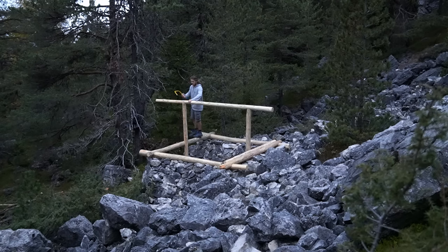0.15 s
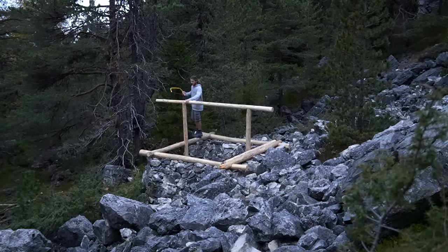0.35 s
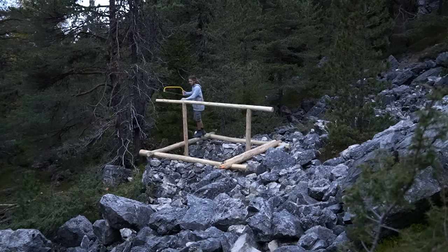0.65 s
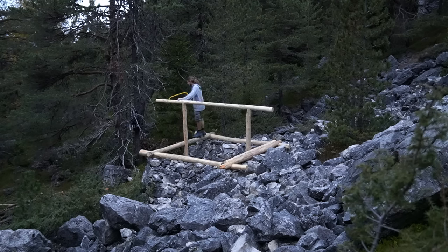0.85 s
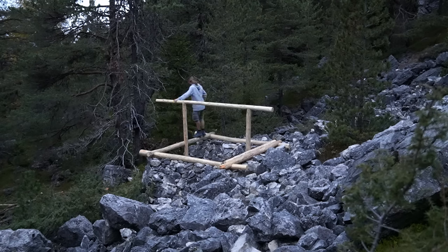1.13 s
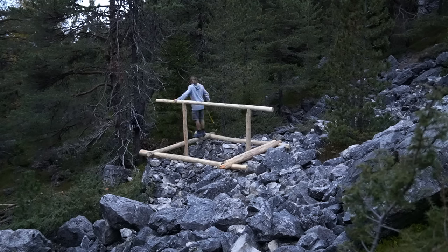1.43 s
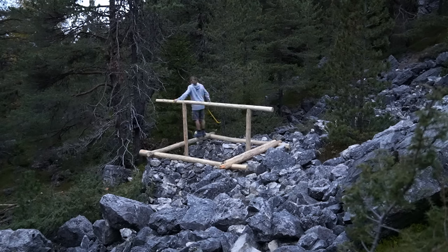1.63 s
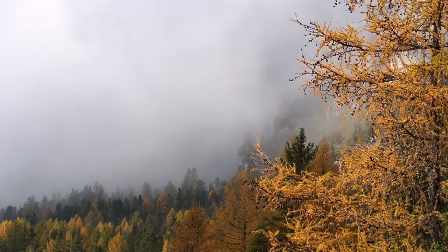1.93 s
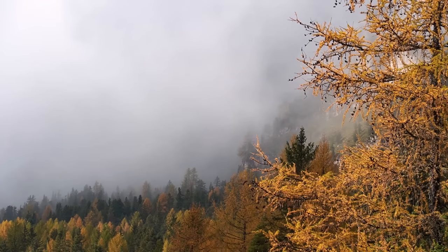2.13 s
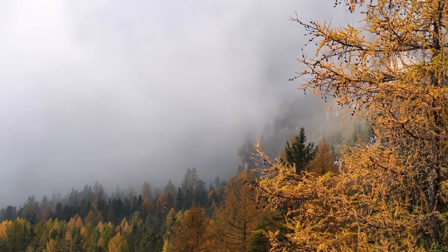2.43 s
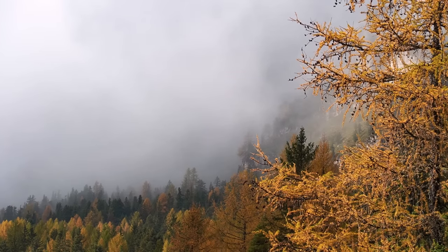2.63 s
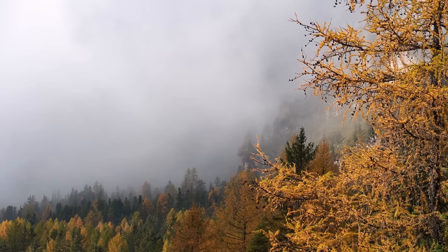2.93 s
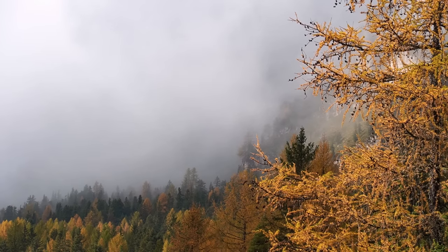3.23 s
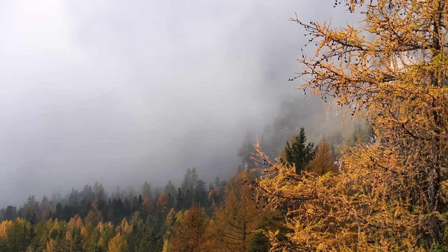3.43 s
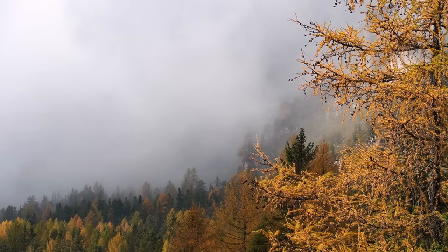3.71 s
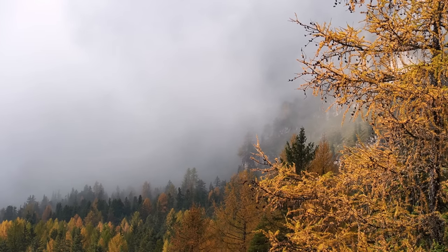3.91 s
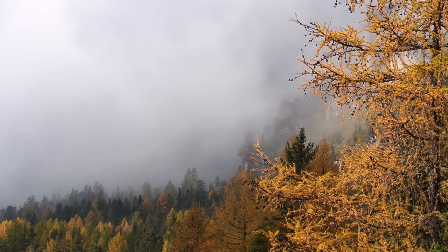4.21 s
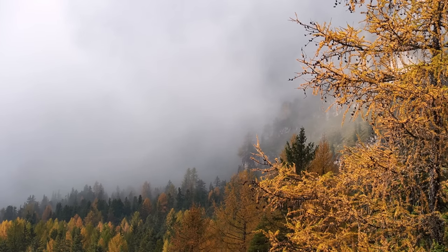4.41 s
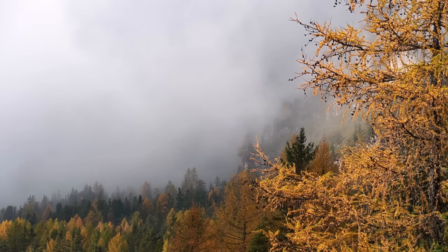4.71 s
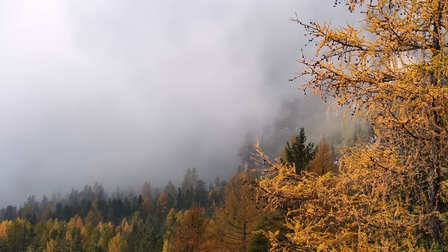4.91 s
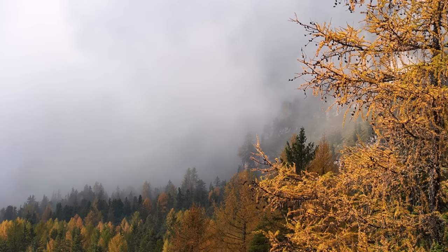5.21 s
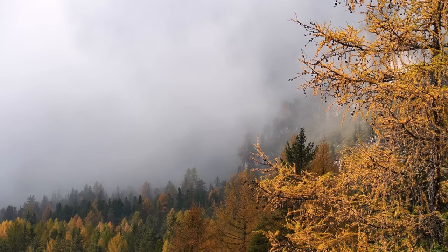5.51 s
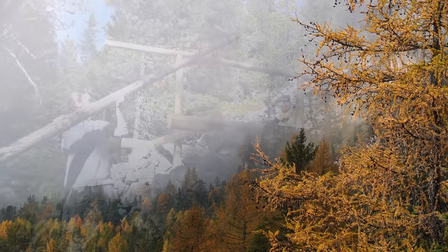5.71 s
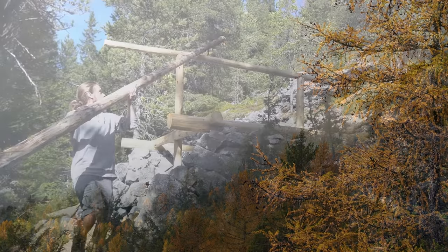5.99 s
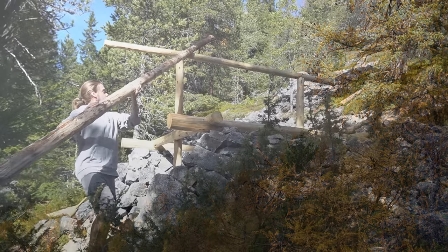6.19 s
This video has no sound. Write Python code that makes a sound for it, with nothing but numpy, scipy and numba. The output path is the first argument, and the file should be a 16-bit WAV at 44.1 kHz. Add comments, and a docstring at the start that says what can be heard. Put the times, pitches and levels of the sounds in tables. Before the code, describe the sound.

Stones clack and grit slides on a rocky slope, steel tinkles faintly, then heavy wind buffets the microphone before a wooden pole knocks on logs.

```python
"""Stones clack and grit slides on a scree slope, over trees soughing and the microphone's hiss; steel tinkles.
Gusts then buffet the microphone into its limiter. Close by, a long pole knocks on a log frame, bark rustles and snaps.
Stones, sharp cracks and bark are shaped grains; pole and tool are decaying modes struck by short pushes;
wind and trees are coloured noise with wandering levels, the hardest eddies single swings with a sharp corner."""
import sys
import numpy as np
from scipy import signal
from scipy.fft import rfft, irfft, next_fast_len
from scipy.io import wavfile
from scipy.ndimage import uniform_filter1d, minimum_filter1d
from numba import njit

SR = 44100
rng = np.random.default_rng(int(sys.argv[2]) if len(sys.argv) > 2 else 0)


def waveform_to_disk(signal):
    """Save audio, clipped to [-1, 1], as 16-bit WAV at the path in sys.argv[1]."""
    frames = np.transpose(np.atleast_2d(signal))
    scaled = np.clip(frames, -1, 1) * 32767
    samples = np.round(scaled).astype(np.int16)
    wavfile.write(sys.argv[1], SR, samples)


N = 280035


def undb(db):
    """Gain of a level in dB."""
    return 10 ** (np.asarray(db) / 20)


def curve(table):
    """Joins the rows of a table by straight lines; returns each column after the time, per sample."""
    s, *columns = np.transpose(table)
    now = np.arange(N) / SR
    return [np.interp(now, s, column) for column in columns]


def colour(x, points):
    """Shapes x by (Hz, dB) points, holds the end levels for an octave, cuts the rest; rms 1."""
    hz, db = np.transpose(points)
    size = next_fast_len(len(x))
    f = np.arange(size // 2 + 1) * SR / size
    inside = (f > hz[0] / 2) * (f < hz[-1] * 2)
    gain = undb(np.interp(np.log(f + 1), np.log(hz), db)) * inside
    y = irfft(rfft(x, size) * gain, size)[:len(x)]
    return y / np.std(y)


def walk(rate):
    """Random levels held for 1 / rate seconds and slewed twice; spread 1."""
    k = int(SR / rate)
    held = np.repeat(rng.standard_normal(N // k + 1), k)
    slewed = uniform_filter1d(uniform_filter1d(held, k), k)[:N]
    return slewed / np.std(slewed)


def grains(rate, spread_db, bed, size=N):
    """Clicks of very unequal size, about rate per second, over a bed of noise."""
    size_db = spread_db * np.minimum(rng.exponential(size=size), 4)
    happens = rng.random(size) < rate / SR
    clicks = happens * undb(size_db) * rng.standard_normal(size)
    return clicks / np.std(clicks) + bed * rng.standard_normal(size)


def add(out, s, x):
    """Mixes x into out from time s."""
    i = int(s * SR)
    out[i:i + len(x)] += x[:N - i]


def ring(modes, gains, free=1):
    """Decaying modes struck at once, neighbours in opposite sign; free scales their ring times."""
    hz, db, t60 = np.transpose(modes)[:, :, None]
    t = np.arange(int(.7 * SR)) / SR
    sign = (-1) ** np.arange(len(modes))
    decay = undb(db - 60 * t / (t60 * free))
    return (sign * gains) @ (decay * np.sin(2 * np.pi * hz * t))


@njit
def limit(x, top, release):
    """Gain that drops at once, 40 samples ahead of a peak, and recovers exponentially."""
    gain, envelope = np.empty(len(x)), top
    for i in range(len(x)):
        ahead = abs(x[min(i + 40, len(x) - 1)])
        envelope = max(ahead, envelope + (top - envelope) * release)
        gain[i] = top / envelope
    return gain


def cracks(table, tilt_db, rises, echo_db, echo_s, ringing=lambda x: x):
    """Bursts of tiny contacts, each with a quieter tail as rocks and trunks return it."""
    out, t = np.zeros(N), np.arange(SR // 4) / SR
    for (s, db, low_hz, top_hz, t60), rise in zip(table, rises):
        shape = [(low_hz / 3, -30), (low_hz, 0), (top_hz * .85, tilt_db),
                 (top_hz * 1.3, tilt_db - 22), (top_hz * 3, -55)]
        body = ringing(colour(grains(3000, 2.5, 1.1, size=len(t)), shape))
        direct = undb(-60 * np.maximum(t - rise, 0) / t60)
        echo = undb(echo_db - 60 * t / echo_s)
        attack = np.minimum(t / rise, 1)
        add(out, s - rise / 2, undb(db) * body * attack * (direct + echo))
    return out


def resonant(x):
    """Lifts the resonances of the stone slabs; rms 1."""
    # Resonances of the slabs in Hz.
    slab_hz = [2210, 3700, 4150, 4740]
    width_hz, between_db = 300, -4
    f = np.arange(len(x) // 2 + 1)[:, None] * SR / len(x)
    peaks = (1 / (1 + 2j * (f - slab_hz) / width_hz)).sum(axis=1)
    y = irfft(rfft(x) * (undb(between_db) + peaks), len(x))
    return y / np.std(y)


def stone_clacks():
    """Knocking stones ring their slabs; dull clacks start almost at once, bright ones grind in."""
    # Stones knocking together. Each row: start in seconds, level in dB, upper corner in Hz, t60 in seconds.
    knocks = [(0.3639, -23, 2580, 0.047), (0.373, -21.5, 5070, 0.014), (.399, -21, 3620, 0.037),
              (.406, -15, 7000, 0.03), (.423, -23.5, 6000, 0.03), (0.632, -44, 1070, 0.13),
              (0.669, -30.5, 2400, 0.12), (.677, -43, 4500, 0.11), (.866, -38, 2920, 0.018),
              (0.998, -34, 3780, 0.06), (1.016, -30, 5060, 0.082), (1.088, -34, 4500, 0.054),
              (1.3, -40, 1360, 0.36)]
    octaves = 2.46  # width of a clack below its upper corner
    rise_s = .005  # for a 5 kHz clack
    bands = [(s, db, top_hz / 2 ** octaves, top_hz, t60) for s, db, top_hz, t60 in knocks]
    rises = [rise_s * (top_hz / 5e3) ** 2 for s, db, top_hz, t60 in knocks]
    return cracks(bands, -5.5, rises, -15, 0.26, resonant)


def friction(coarse, fine, surface, rate, bed):
    """Dense slips excite a coarse and a fine part of the surface."""
    # Colour of the fine part. Each row: frequency in Hz, level in dB per Hz.
    fine_colour = [(4000, -12.5), (6500, -6), (11000, -9.5), (16000, -10.5)]
    slips = grains(rate, 2.5, bed) * undb(1.6 * walk(50))
    return coarse * colour(slips, surface) + fine * colour(slips, fine_colour)


def grit():
    """Coarse grit dies away while fine dust swells; both drop when the slide stops."""
    # Grit sliding after the stones. Each row: start in seconds, length in seconds,
    # level in dB at the start, fine dust in dB at the end.
    slides = [(0.437, 0.11, -34.5, -43), (1.033, 0.2, -45.5, -66)]
    # Colour of the coarse grit. Each row: frequency in Hz, level in dB per Hz.
    coarse_colour = [(500, 2), (1200, 4), (2500, 3), (4300, 5.5), (5500, -2.5), (7500, -18), (10000, -46)]
    fall_db_s, dust_rise_db_s, settle_db_s = 57, 112, 500
    stop_db, stop_s = 8.5, 0.04
    t, coarse, dust = np.arange(N) / SR, 0, 0
    for s, length, db, dust_db in slides:
        left = s + length - t
        stop = stop_db * np.clip(-left / stop_s, 0, 1)
        coarse = coarse + (t > s) * undb(db - fall_db_s * (t - s) - stop)
        below_peak_db = np.maximum(dust_rise_db_s * left, -settle_db_s * left)
        dust = dust + (t > s) * undb(dust_db - below_peak_db)
    return friction(coarse, dust, coarse_colour, 2000, .9)


def tool():
    """Short bright modes of thin steel; a soft tap leaves the top ones quiet."""
    # Taps on the steel. Each row: start in seconds, strength in dB, corner in Hz above which modes stay quiet.
    taps = [(1.63, -37, 6600), (1.77, -28.5, 7000)]
    # Modes of the steel. Each row: frequency in Hz, level in dB, t60 in seconds.
    steel_modes = [(1660, -2, 0.029), (4500, -8.5, 0.039), (7000, -17, 0.14), (9250, -37.5, 0.065)]
    # A ring still dying at the start. Each row: frequency in Hz, level in dB, t60 in seconds.
    dying_ring = [(1400, -51, 1)]
    out, hz = np.zeros(N), np.array(steel_modes)[:, 0]
    for s, db, top_hz in taps:
        softness = 1 / (1 + (hz / top_hz) ** 4)
        add(out, s, undb(db) * ring(steel_modes, softness))
    add(out, 0, ring(dying_ring, np.ones(len(dying_ring))))
    return out


def pole():
    """Each push favours some bending modes of the pole; pushes starting together form one knock."""
    # Pushes of the knocks. Each row: start in seconds, strength in dB, best excited frequency in Hz,
    # spread in octaves, share of the free ring time.
    pushes = [(5.687, -14, 790, 0.12, 0.33), (5.7036, -5.5, 865, 0.37, 0.11), (5.708, -27, 1040, .15, 0.3),
              (5.714, -24, 1190, 0.11, 0.54), (5.73, -9, 172, 0.43, 0.48), (5.814, -28, 2460, 0.25, 0.8),
              (5.817, -10, 560, 0.37, 0.33), (5.828, -10.5, 442, 0.61, 1), (5.822, -15, 1070, 0.055, 1),
              (5.8565, -20.5, 382, 0.19, 1), (6.160, -14, 950, 0.4, 0.5), (6.160, -6, 240, 0.22, 0.6),
              (6.160, -18, 370, 0.35, 0.5), (6.160, -13, 630, 0.15, 0.85), (6.169, -3, 143, 0.56, 0.85),
              (6.176, -14.5, 1080, 0.36, 0.4), (6.19, -9, 138, 0.57, 0.37), (6.337, -9.5, 183, 0.47, 0.34)]
    # Pitches of the bending modes in Hz.
    bending_hz = [131, 183, 250, 335, 421, 513, 615, 735, 796, 846, 1087, 1233, 1610, 1880, 2314, 2390]
    # The same modes. Each row: level in dB, free t60 in seconds.
    bending_decay = [(-1.5, 0.18), (-2, 0.21), (-3.5, 0.37), (2.5, 0.69), (6, 0.49), (2, 0.25), (5, 0.17),
                     (4, 0.18), (8.5, 0.045), (-3, 0.26), (-1.5, 0.12), (-1.5, 0.098), (0, 0.14),
                     (1, 0.059), (12.5, 0.15), (15, 0.039)]
    chatter_db, chatter_s = -25, 0.01  # the contact rattles on briefly after each push
    grip_s, grip_db_s, let_go_s = 5.915, 100, 6.15  # a hand damps the pole for a while
    out, hz, t = np.zeros(N), np.array(bending_hz), np.arange(SR // 25) / SR
    modes, now = np.column_stack([hz, bending_decay]), np.arange(N) / SR
    for s, db, best_hz, octaves, free in pushes:
        share = undb(-6 * (np.log2(hz / best_hz) / octaves) ** 2)
        rattle = rng.standard_normal(len(t)) * np.exp(-t / chatter_s)
        push = (t == 0) + undb(chatter_db) * rattle / np.sqrt(0.00025 * SR)
        add(out, s, undb(db) * signal.fftconvolve(ring(modes, share, free), push))
    damping_db = grip_db_s * np.maximum(now - grip_s, 0) * (now < let_go_s)
    return out * undb(-damping_db)


def contact_cracks():
    """Sharp cracks: contacts of the steel taps and pole blows, and snaps in the bark."""
    # Each row: start in seconds, level in dB, lower corner in Hz, upper corner in Hz, t60 in seconds.
    sharp_cracks = [(1.628, -41, 1200, 4940, 0.02), (1.768, -36, 1300, 12600, 0.044),
                    (4.496, -29, 2400, 8500, 0.0045), (5.333, -36.5, 2550, 11000, 0.036),
                    (5.669, -31, 694, 8850, 0.027), (5.771, -25, 794, 11600, 0.0083),
                    (5.813, -19, 1400, 7000, 0.075), (5.817, -19.5, 500, 15000, 0.012),
                    (5.825, -14, 1020, 5630, 0.071), (5.967, -25, 545, 1190, 0.03),
                    (6.161, -22.5, 410, 3140, 0.11), (6.185, -15, 3560, 15500, 0.011),
                    (6.192, -25, 2980, 15500, 0.018), (6.278, -17, 3740, 15600, 0.012),
                    (6.287, -26.5, 1000, 15120, 0.03)]
    return cracks(sharp_cracks, -9, [0.0008] * len(sharp_cracks), -16, .08)


def bark():
    """Bark and cloth rub, dense slips growing louder, with harder strokes."""
    # Rubbing. Each row: time in seconds, level in dB.
    rubbing = [(5.3, -59), (5.44, -52.5), (5.68, -41), (6.05, -42), (6.35, -38.5)]
    # Harder strokes. Each row: start in seconds, length in seconds, dB above the rubbing.
    hard_strokes = [(5.336, 0.071, 10.5), (5.879, 0.04, 5), (6.107, 0.019, 8.5), (6.164, 0.062, 7.5)]
    # Colour of the bark. Each row: frequency in Hz, level in dB per Hz.
    bark_colour = [(300, -3), (800, 14), (2000, 5), (4500, -0.5), (7000, -11.5), (10000, -34)]
    edge_s, treble_db = 0.029, -5
    t = np.arange(N) / SR
    harder_db = sum(db * ((t > s) & (t < s + length)) for s, length, db in hard_strokes)
    smooth_db = uniform_filter1d(1. * harder_db, int(edge_s * SR))
    level = (t > rubbing[0][0]) * undb(curve(rubbing)[0] + smooth_db)
    return friction(level, level * undb(treble_db), bark_colour, 1200, 1.44)


def wind():
    """Pressure swings on the diaphragm; faster eddies come in bunches, the hardest one by one."""
    # Wind on the microphone. Each row: time in seconds, buffet level in dB.
    gusts = [(0.03, -62.5), (1.35, -44), (1.51, -37), (1.73, -25.5), (2.23, -25.5), (2.5, -34.5),
             (2.58, -20), (2.67, -7), (2.81, -14), (2.87, -9), (3.03, -17), (3.08, -5), (3.28, -7),
             (3.51, -13.5), (3.64, -9.5), (3.68, -14.5), (3.74, -8), (3.88, -7), (3.93, -12.5), (4.07, -4),
             (4.39, -6), (4.43, -11.5), (4.48, -12), (4.6, -10.5), (4.72, -21), (5.0, -10.5), (5.18, -20.5),
             (5.23, -6), (5.35, -21), (5.46, -17), (5.51, -11), (5.93, -23.5), (6.02, -33), (6.3, -30)]
    # Share of fast eddies in the wind. Each row: time in seconds, level in dB.
    fast_share = [(0, 14), (1.5, -16), (2.5, -16.5), (3.9, -20), (4.25, -7.5), (4.9, -22), (5.3, -10.5),
                  (6.1, -1)]
    # Colour of the slow buffets. Each row: frequency in Hz, level in dB per Hz.
    buffet_colour = [(12, -18.5), (25, 13), (43, 26.5), (77, 24.5), (115, 16), (150, 0), (200, -77.5)]
    # Colour of the fast eddies. Each row: frequency in Hz, level in dB per Hz.
    eddy_colour = [(90, -2), (130, 7.5), (180, 3), (260, -9), (400, -37), (800, -71.5)]
    # Single hard eddies. Each row: start in seconds, peak of the swing in dB.
    hard_eddies = [(2.872, -4), (2.929, -4), (3.063, -5), (3.102, -3), (3.143, -6), (3.185, -4),
                   (3.215, -3), (3.276, -1.5), (3.858, -4.5), (4.181, 3), (4.212, 0), (4.239, 3.5),
                   (4.267, 5), (4.346, 6.5), (4.473, 0), (4.585, -3.5), (5.225, -5)]
    lowest_hz, jerk_db, jerk_s = 81.2, -7.5, 0.0015
    low = colour(rng.standard_normal(N), buffet_colour)
    low = low * undb(2.06 * walk(24.94) + 0.53 * walk(6.21))
    fast = colour(grains(300, 6.6, 0.35), eddy_colour)
    fast = fast * undb(curve(fast_share)[0] + 3.6 * walk(15))
    out, t = undb(curve(gusts)[0]) * (low + fast), np.arange(SR // 20) / SR
    for (s, peak_db), u in zip(hard_eddies, rng.random((len(hard_eddies), 1))):
        cycles = t * lowest_hz * (1 + 0.65 * u)
        swing = np.sin(2 * np.pi * cycles) * cycles * np.exp(-2 * cycles)
        add(out, s, undb(peak_db) * swing / swing.max())
        # the diaphragm jerks: a sharp corner that grows quickly with the eddy
        jerk = t / jerk_s * np.exp(1 - t / jerk_s)
        add(out, s + 0.00392, undb(jerk_db + 1.65 * peak_db) * jerk)
    return out


def forest():
    """Needles sough as coloured noise with a slight flicker, over the steady hiss of the microphone."""
    # Wind in the trees. Each row: time in seconds, level in dB, rustle of near needles in dB against it.
    trees = [(0, -41.5, 1), (1.2, -42.5, 5), (1.7, -37.5, -0.5), (2.8, -36.5, -26.5), (4.6, -38, -13.5),
             (5.4, -39, -11)]
    # Colour of the sough. Each row: frequency in Hz, level in dB per Hz.
    sough_colour = [(60, -10.5), (120, -5), (350, -2), (600, -7.5), (1000, -17), (1500, -27), (2300, -35),
                    (5000, -48)]
    # Colour of the microphone hiss. Each row: frequency in Hz, level in dB per Hz.
    hiss_colour = [(1500, 0.89), (4000, 5.7), (9000, 1.7), (16000, 2.9)]
    db, near_db = curve(trees)
    sough = colour(rng.standard_normal(N), sough_colour)
    rustle = signal.sosfilt(signal.butter(2, 1000, "high", fs=SR, output="sos"), sough)
    needles = (sough + undb(near_db) * rustle) * undb(db + 1.45 * walk(9.8))
    hiss = undb(-56.5) * colour(rng.standard_normal(N), hiss_colour)
    return needles + hiss


def scene():
    """All sources, one microphone."""
    stones = stone_clacks() + grit()
    wood_and_contacts = pole() + contact_cracks() + bark()
    return (stones + tool() + wood_and_contacts + wind() + forest())[None]


def record(dry):
    """A slow gain control rides the gusts, a look-ahead limiter ducks all under their peaks; steep top cut."""
    ride_db, ride_s, ride_share = -5.5, 2, 0.18
    drive_db, ceiling_db, release_s = 2.5, 0, .036
    top_hz = 15700
    dry = signal.sosfilt(signal.butter(1, 12, "high", fs=SR, output="sos"), dry)
    ride = limit(dry[0], float(undb(ride_db)), 1 / (ride_s * SR)) ** ride_share
    ridden = undb(drive_db) * dry[0] * uniform_filter1d(ride, size=2000)
    gain = limit(ridden, float(undb(ceiling_db)), 1 / (release_s * SR))
    smooth_gain = uniform_filter1d(minimum_filter1d(gain, size=160), size=80)
    held = np.clip(ridden * smooth_gain, -1, 1)[None]
    return signal.sosfilt(signal.ellip(10, .1, 70, top_hz, fs=SR, output="sos"), held)


dry = scene()
out = record(dry)
waveform_to_disk(out)
```